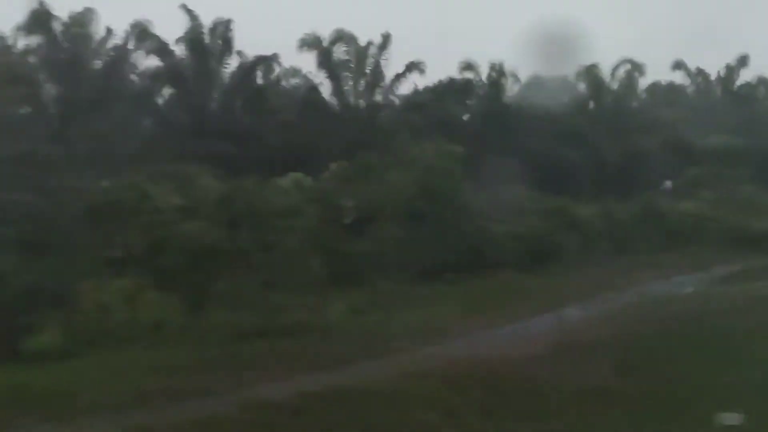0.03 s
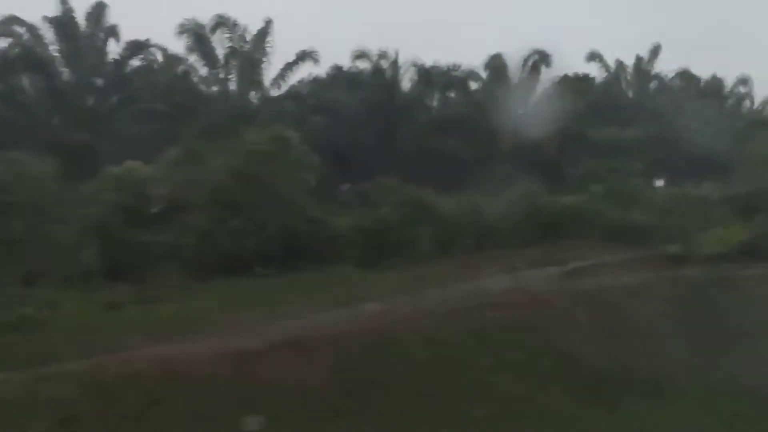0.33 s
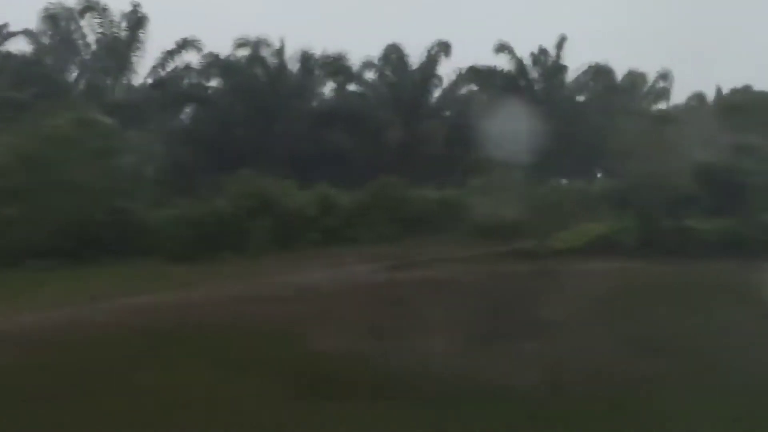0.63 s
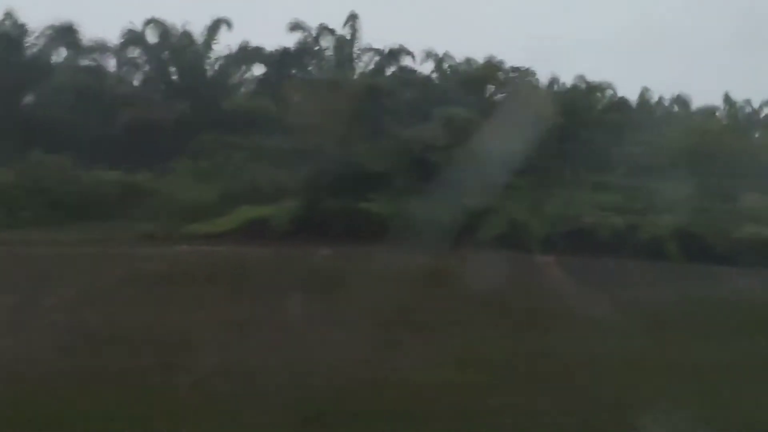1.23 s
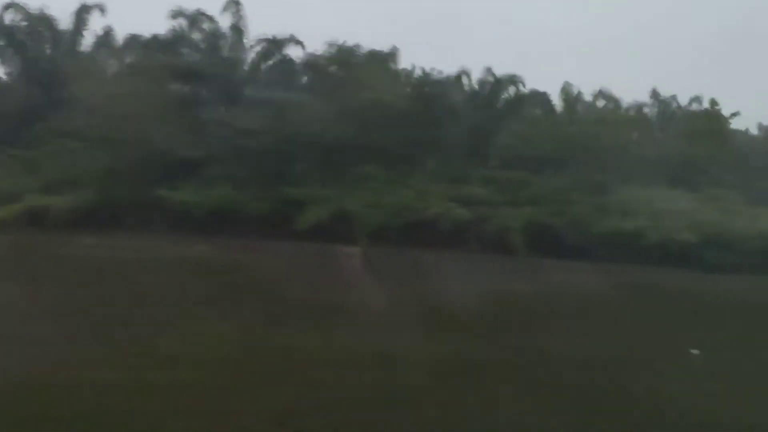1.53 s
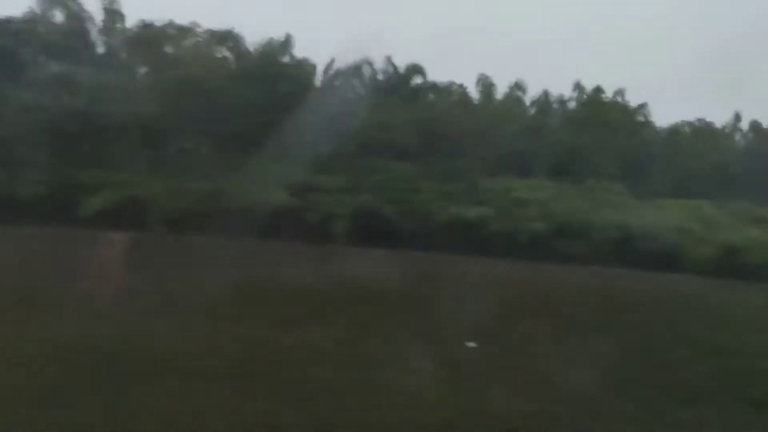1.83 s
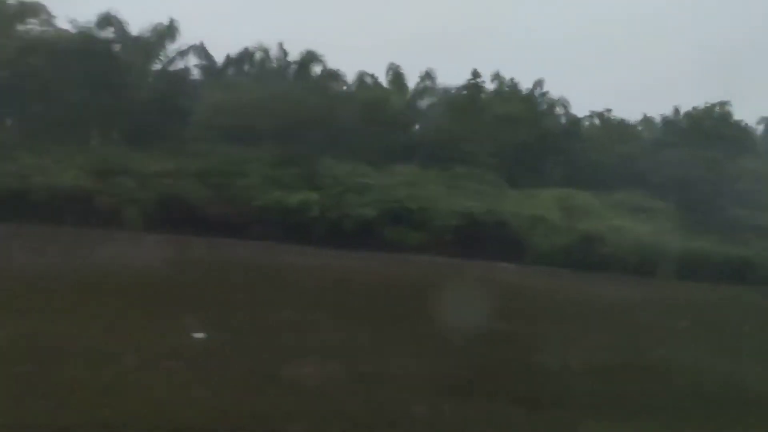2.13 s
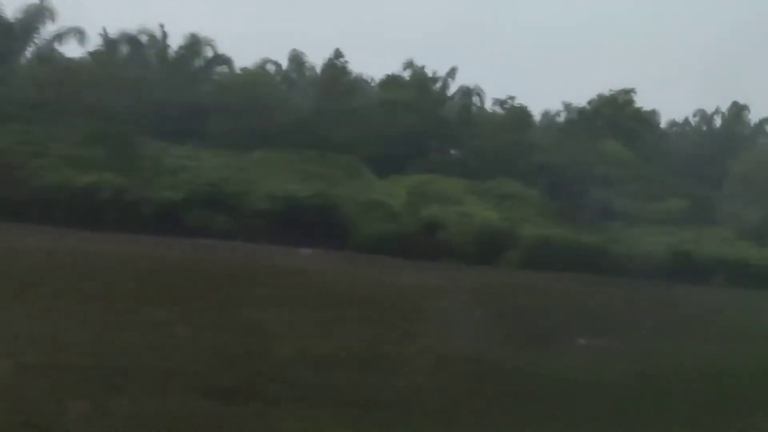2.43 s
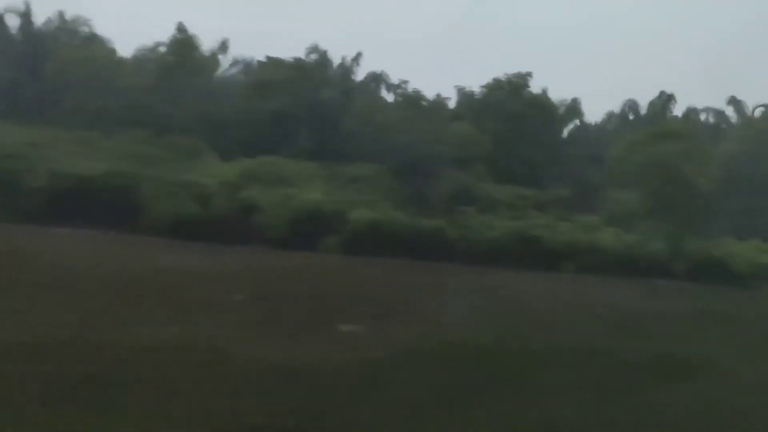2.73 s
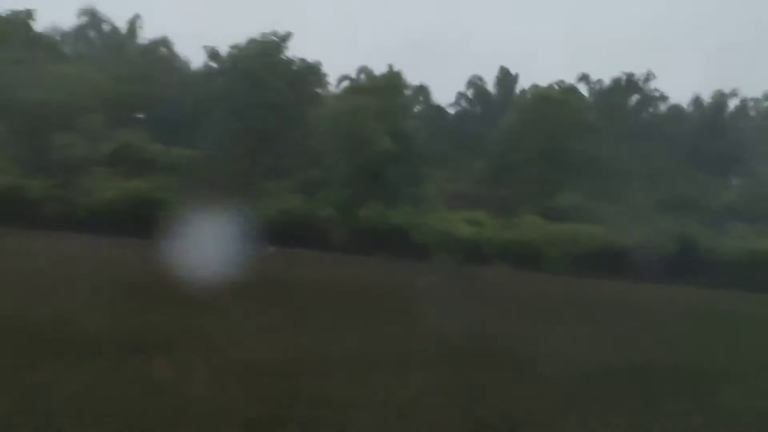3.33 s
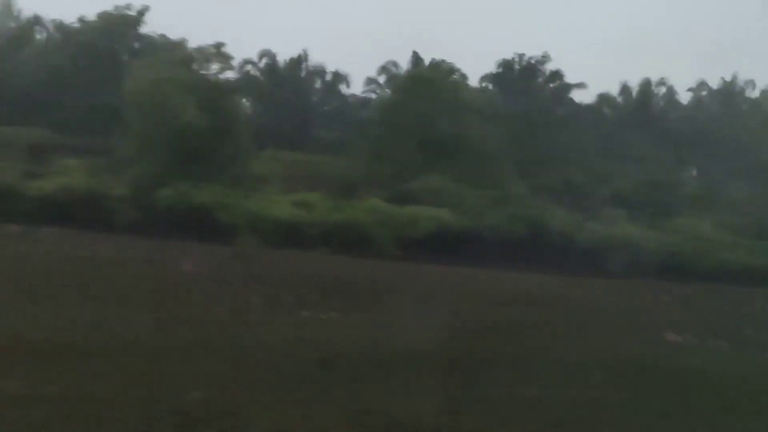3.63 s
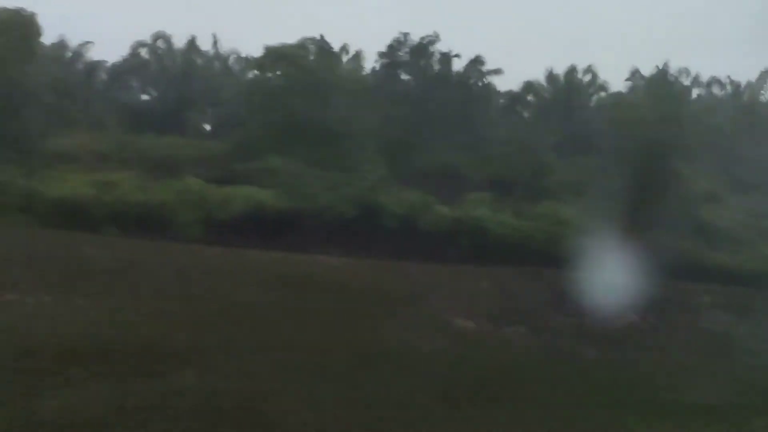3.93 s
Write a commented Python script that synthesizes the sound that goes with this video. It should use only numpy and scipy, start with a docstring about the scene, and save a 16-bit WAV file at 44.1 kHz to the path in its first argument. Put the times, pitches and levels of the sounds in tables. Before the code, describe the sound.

A bus rumbles along a wet road, heard from inside, its diesel hum swelling and fading under a faint gear whine and spray hiss. A bump thuds early, a softer one follows later, then one sharp click.

```python
"""Inside a bus cruising on a wet road. A six-cylinder diesel drones, its deep hum swells and fades,
and the meshing teeth of two gears whine. The tyres rumble and make the cabin ring and boom,
while air and spray hiss along the window on the left. Bumps shake the body panels into thuds,
a few faint ticks sound near the glass, and one sharp click comes near the end."""
import sys
import numpy as np
from scipy import signal
from scipy.fft import rfft, irfft
from scipy.io import wavfile
from scipy.ndimage import uniform_filter1d

SR = 44100
rng = np.random.default_rng(int(sys.argv[2]) if len(sys.argv) > 2 else 0)


def unload_audio(sound):
    """Save the sound as a 16-bit wav file, at the path given as the first command line argument."""
    columns = np.transpose(np.atleast_2d(sound))
    # keep every value between -1 and 1, then stretch to whole-number steps
    steps = np.round(np.clip(columns, -1, 1) * 32767)
    wavfile.write(sys.argv[1], SR, steps.astype(np.int16))


N = 176400


def undb(db):
    return 10 ** (np.asarray(db) / 20)


def unit(x):
    return x / np.sqrt(np.mean(x ** 2))


def freqs():
    return np.maximum(np.arange(N // 2 + 1) * SR / N, 1)


def contour(points):
    """Join (pitch_hz, value) points into a curve over all pitches."""
    hz, value = np.array(points).T
    return np.interp(np.log(freqs()), np.log(hz), value)


def fade(t, points):
    """Join (time_s, level_db) points into a changing volume."""
    return undb(np.interp(t, *np.array(points).T))


def mode(hz, width_hz):
    """How something that rings at one pitch responds to each frequency."""
    f = freqs()
    return 1 / (1 + 1j * (f * f - hz * hz) / (f * width_hz))


def resonance(hz, width_hz):
    """The same ringing applied twice, for a steeper peak."""
    return mode(hz, width_hz) ** 2


def shape(x, gain):
    """Filter a sound, then set its average strength to 1."""
    return unit(irfft(rfft(x) * gain, N))


def walk(rate_hz):
    """Smooth random motion, about 1 in size."""
    return shape(rng.standard_normal(N), 1 / (1 + (freqs() / rate_hz) ** 4))


def diffuse():
    """Noise from all round the cabin: alike on both sides in the bass, unrelated in the treble."""
    # how alike left and right are (1 same, -1 opposite): pitch_hz, likeness
    likeness = [(100, 0.99), (200, 0.94), (380, 0.93), (500, 0.76), (630, 0.23), (900, 0.0059),
                (1100, -0.42), (1300, -0.61), (1800, .25), (2400, -0.08), (3200, 0.1), (5000, -0.042)]
    alike = np.clip(contour(likeness), -.99, .995)
    mid, side = rfft(rng.standard_normal((2, N))) * np.sqrt([1 + alike, 1 - alike])
    return irfft(np.array([mid + side, mid - side]), N)


def lean():
    """Left and right volumes that tip each pitch to one side."""
    # how much louder the left side is: pitch_hz, difference_db
    left_lead = [(60, 2), (150, 0), (300, 1), (550, 5.5), (800, -1), (1100, -3)]
    return undb(np.array([[1], [-1]]) * contour(left_lead) / 2)


def shaft_tones(shaft_hz, tones, flutter_db):
    """Tones locked to one turning shaft, each fluttering in level."""
    turn = 2 * np.pi * np.cumsum(shaft_hz) / SR
    out = 0
    for multiple, db, lead in tones:
        phase = multiple * turn + rng.uniform(0, 2 * np.pi) + np.array([[lead], [-lead]]) / 2
        out += undb(db) * unit(np.sin(phase) * undb(flutter_db * walk(6.7)))
    return out


def engine_drone(t, cycle_hz):
    """The diesel's repeating firings make a drone that grows louder under load."""
    # engine tones: multiple of the cycle rate, level_db, left_lead_rad
    tones = [(1, -43.5, -1), (2, -45.5, -1), (10, -48.5, 0), (24, -40, 0.34), (30, -52, 0), (48, -56, 2.5),
             (54, -61, -0.5), (72, -53.5, -2.5)]
    # how hard the engine works: time_s, gain_db
    load = [(0, -3.5), (1.4, -0.5), (2.3, 1), (3.2, 1.5), (4, 0)]
    return undb(-.5) * shaft_tones(cycle_hz, tones, flutter_db=3) * fade(t, load)


def engine_hum(t, cycle_hz):
    """Two deep engine tones, one at the firing rate, swell and fade together."""
    # deep tones: multiple of the cycle rate, relative_db, left_lead_rad
    tones = [(6, 0.66, 0), (8, -1.9, 0)]
    # loudness of the hum: time_s, level_db
    swells = [(0, -45.5), (.8, -46.5), (1.08, -43), (1.6, -45), (1.9, -37.5), (2.13, -32.5), (2.24, -46),
              (2.45, -37), (2.58, -35), (2.68, -45.5), (3, -45.5), (3.27, -41), (4, -47)]
    return shaft_tones(cycle_hz, tones, flutter_db=1.4) * fade(t, swells)


def gear_whine(t):
    """Two gears whine at the rate their teeth meet and an octave above."""
    # the gears under load: time_s, tooth_rate_hz, gain_db
    run = [(0, 451.5, 3), (.45, 451.2, 0), (1.1, 449.2, -1), (1.5, 451, -0.5), (2.3, 448.8, -1.5),
           (3.1, 449.5, -1.5), (3.6, 447.4, 0), (3.85, 448.7, 4), (4, 444.5, 5)]
    # whine tones: multiple of the tooth rate, level_db, left_lead_rad
    tones = [(1, -56, 0.93), (2, -48.5, -1.27)]
    times, rates, db = np.array(run).T
    tooth_hz = np.interp(t, times, rates) * (1 + .00396 * walk(12.8))
    return shaft_tones(tooth_hz, tones, flutter_db=3) * undb(np.interp(t, times, db))


def tyre_rumble():
    """Tyres rolling on the road make a low, broad noise."""
    # tone colour of the rumble: pitch_hz, relative_db
    colour = [(8, -8), (20, -4), (40, -1), (60, -6), (90, -5), (120, -7), (170, -5.5), (260, -6.5),
              (380, -8), (500, -11.5), (600, -8), (720, -12), (930, -12.5), (1100, -18), (1500, -28),
              (3000, -64)]
    return undb(-32) * shape(diffuse(), undb(contour(colour)) * lean())


def cabin_ring(t):
    """The road's shaking makes the cabin ring at its own pitches."""
    # cabin resonances: pitch_hz, width_hz, level_db
    rings = [(151.7, 10.8, -45), (193, 11.7, -45.5), (218.9, 9.4, -43), (248.9, 12, -44), (327, 28, -45.5),
             (479.2, 20.3, -46), (547.2, 22.6, -46.5), (768, 30, -50.5)]
    # strength of the ringing: time_s, gain_db
    strength = [(0, -1), (1.0, -1), (1.7, .5), (2.75, -3.5), (2.95, 4), (3.25, 0.5), (3.5, -1), (4, 1)]
    ringing = sum(undb(db) * shape(diffuse(), resonance(hz, width) * lean()) for hz, width, db in rings)
    return ringing * fade(t, strength)


def cabin_boom(t):
    """The road also stirs one deep, wide resonance of the cabin."""
    # loudness of the boom: time_s, level_db
    swells = [(0, -38), (.85, -42.5), (1.08, -37), (1.55, -40.5), (2.1, -40), (2.55, -40), (2.95, -46),
              (3.27, -36), (3.6, -42.5), (4, -43.5)]
    return shape(diffuse(), resonance(hz=90.5, width_hz=32.4) * lean()) * fade(t, swells)


def spray_hiss(flicker_db=.5):
    """Air and spray rush along the bus, brighter on the window side."""
    # hiss by the window (left): pitch_hz, relative_db
    window_colour = [(500, -20.5), (1200, -2.5), (1650, -0.5), (1950, -3), (2350, -9), (2950, -8),
                     (3500, -12), (4200, -14), (5000, -19), (5600, -19.5), (6150, -15.5), (6450, -17.5),
                     (7000, -14), (7600, -22), (9000, -25), (11000, -34.5), (15000, -40)]
    # hiss by the aisle (right): pitch_hz, relative_db
    aisle_colour = [(500, -21), (1250, 1), (1900, -1.5), (2200, -5.5), (2800, -9.5), (3500, -14),
                    (5000, -22), (6150, -22), (6500, -25.5), (8000, -27.5), (11000, -36.5), (15000, -59)]
    left, right = diffuse()
    window = undb(-44) * shape(left, undb(contour(window_colour)))
    aisle = undb(-46) * shape(right, undb(contour(aisle_colour)))
    return np.array([window, aisle]) * undb(flicker_db * walk(15))


def bump_thuds(t, rise_s=.018, fall_s=.023, knock_db=5.5, low_cut_hz=180):
    """A wheel meets a bump: the panels start to shudder, take one soft knock and settle."""
    # bumps (a lower top sounds softer): peak_s, level_db, top_hz
    bumps = [(.540, -20.5, 1000), (.685, -33, 1000), (.720, -32.5, 900), (2.926, -30.5, 398)]
    # ringing body panels: pitch_hz, width_hz, relative_db
    panel_rings = [(224, 22, 3.5), (260, 35, -3), (320, 52, -0.5), (373, 45, -2.5), (477, 22, -7),
                   (553, 21, -2), (655, 19, -2.5), (990, 32, -8)]
    panels = sum(undb(db) * mode(hz, width) for hz, width, db in panel_rings)
    panels = panels * lean() / (1 + (low_cut_hz / freqs()) ** 8)
    out = 0
    for peak_s, db, top_hz in bumps:
        body = panels / (1 + (freqs() / top_hz) ** 8)
        shudder = shape(diffuse(), np.abs(body))
        power = uniform_filter1d(np.mean(shudder ** 2, axis=0), size=700)
        shudder /= np.sqrt(power)  # even it out, so the swell sets its outline
        knock = irfft(body * np.exp(-2j * np.pi * freqs() * peak_s), N)  # one blow at peak_s
        swell = np.exp(-np.maximum((peak_s - t) / rise_s, (t - peak_s) / fall_s))
        out += undb(db) * (shudder * swell + undb(knock_db) * knock / np.abs(knock).max())
    return out


def window_ticks(t, right_db=-11):
    """Fittings or drops tick by the window, each a tiny burst of high noise."""
    # faint ticks: start_s, level_db, pitch_hz, decay_s
    ticks = [(1.682, -48, 4800, .003), (1.762, -45, 5000, 0.0032), (2.297, -49, 4500, .004),
             (3.147, -48, 5200, .004)]
    out = 0
    for start_s, db, hz, decay_s in ticks:
        body = resonance(hz, width_hz=.52 * hz)
        burst = rng.standard_normal((2, N)) * (t >= start_s) * np.exp(-np.abs(t - start_s) / decay_s)
        out += undb(db) * irfft(rfft(burst) * body, N) / np.sqrt(np.mean(np.abs(body) ** 2))
    return out * undb([[0], [right_db]])


def click(t, start_s=3.42328, level_db=-25.5, decay_s=.00022):
    """One sharp, dry click near the end: a sudden jump that dies at once."""
    return undb(level_db) * (t >= start_s) * np.exp(-np.abs(t - start_s) / decay_s)


def scene():
    t = np.arange(N) / SR
    firing_hz, cylinders = 77.96, 6
    cycle_hz = firing_hz / cylinders * (1 + .0026 * walk(2.4))  # each cylinder fires once a cycle
    machinery = engine_drone(t, cycle_hz) + engine_hum(t, cycle_hz) + gear_whine(t)
    rumble = tyre_rumble() + cabin_ring(t)
    boom = cabin_boom(t)
    surface_db = .52 * walk(3.4) + .69 * walk(15)  # the road surface makes the rumble swell and flicker
    road = rumble * undb(surface_db) + boom
    return machinery + road + spray_hiss() + bump_thuds(t) + window_ticks(t) + click(t)


def record(dry, top_hz=15500):
    """Cut away the very highest treble."""
    return signal.sosfilt(signal.ellip(10, .2, 80, top_hz, fs=SR, output="sos"), dry)


dry = scene()
out = record(dry)
unload_audio(out)
```